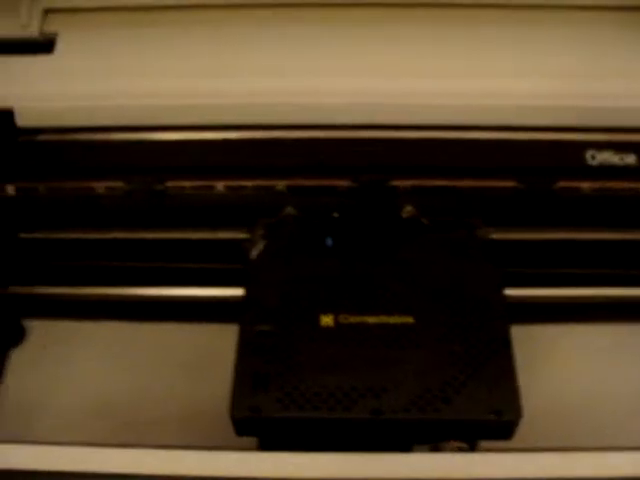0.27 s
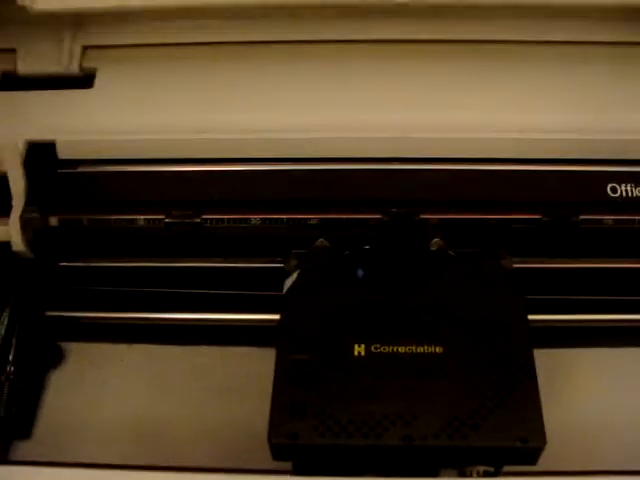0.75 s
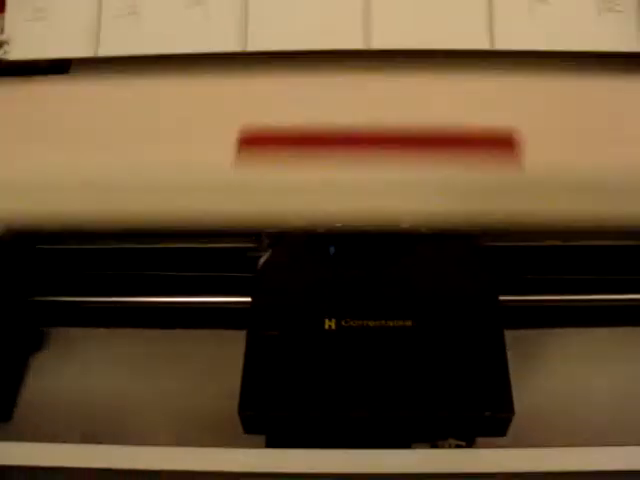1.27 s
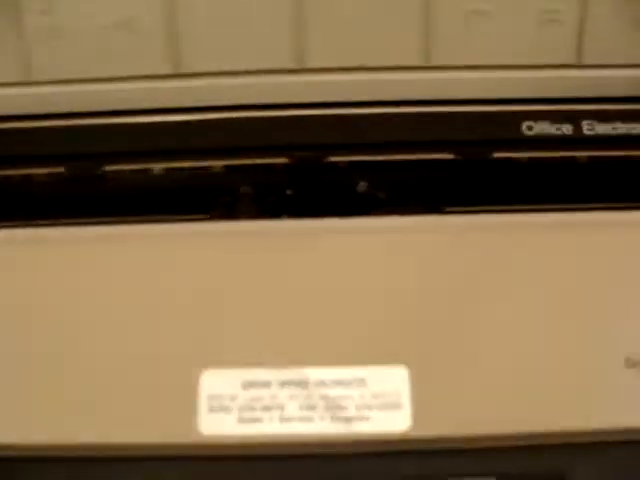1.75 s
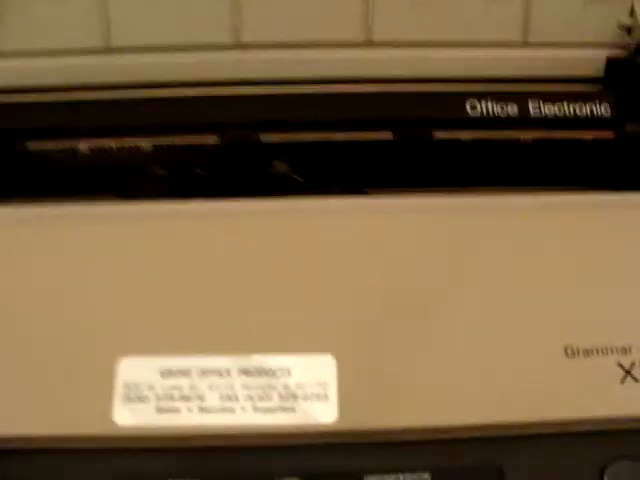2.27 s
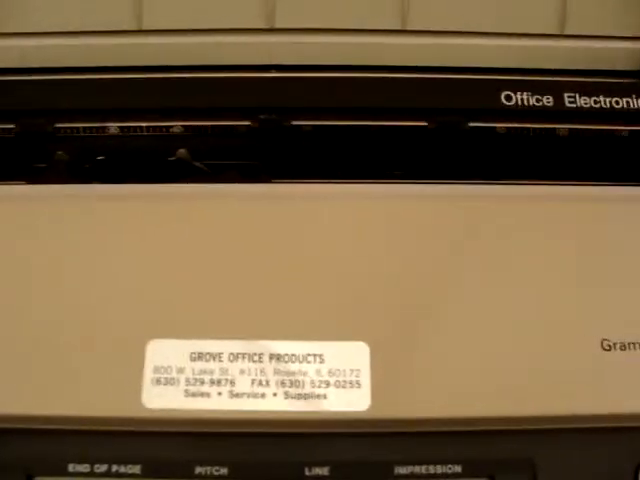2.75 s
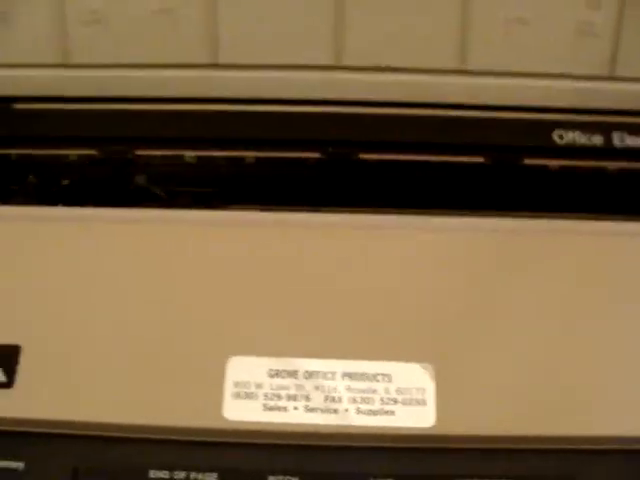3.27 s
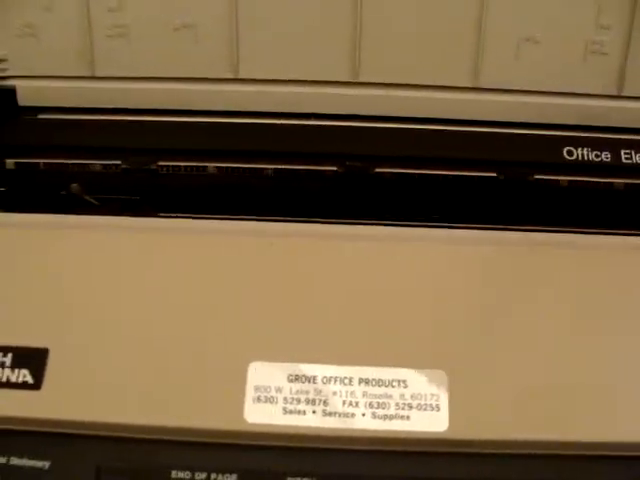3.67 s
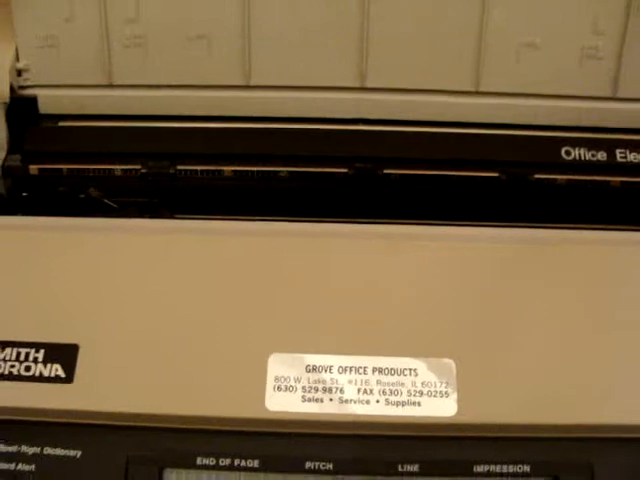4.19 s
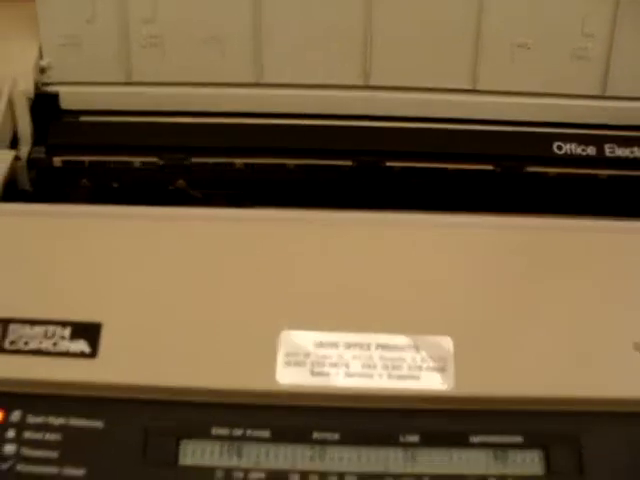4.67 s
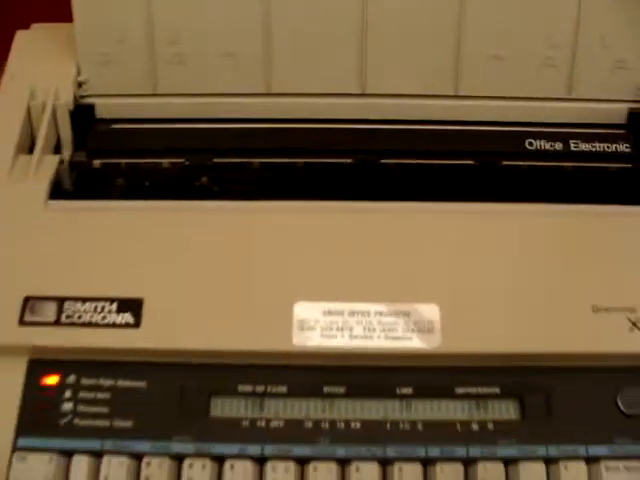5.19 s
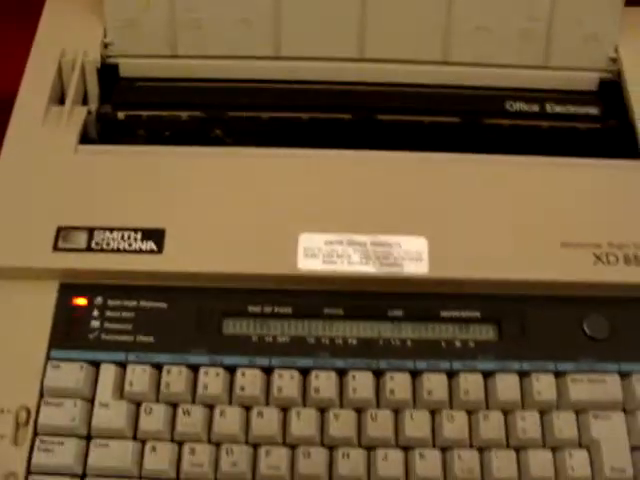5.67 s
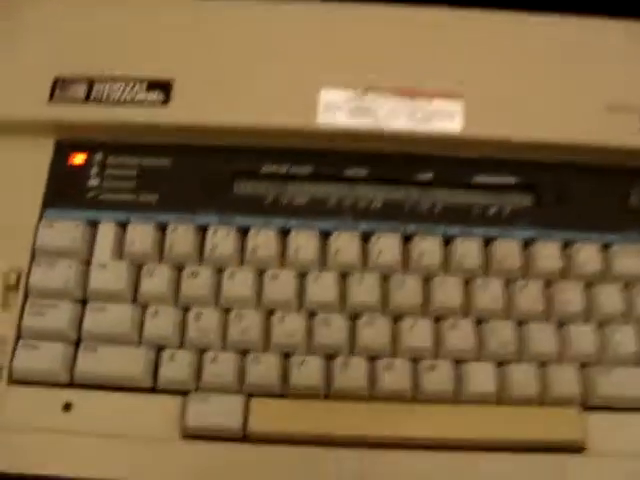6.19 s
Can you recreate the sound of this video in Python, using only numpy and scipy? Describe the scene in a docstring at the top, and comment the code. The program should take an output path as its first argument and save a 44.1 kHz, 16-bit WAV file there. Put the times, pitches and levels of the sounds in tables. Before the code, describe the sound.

Close to an electronic typewriter, small plastic knocks come first, then the hard bang of its lid, with a bright latch click and fast weakening chatter. The drive knocks rapidly through two whirring carrier runs. A steady low motor tone with gear buzz follows, ending in two clusters of clatter with crisp hammer snaps between them. The quiet room's hiss remains, with faint clothing movement and light touches near the end.

```python
"""A quiet room hisses softly, then a hand taps and slides on an electronic typewriter close by.
Motors spurt, the lid slams and chatters, and the print carrier whirrs along its rail in two runs.
A stepper motor hums for over a second, then carrier, print wheel and hammer clatter in short moves;
faint rustles of clothes end it. Blows and rattles are shaped noise and clicks driven through resonant
parts, motors are tones locked to their steps, and room and clothes are coloured noise."""
import sys
import numpy as np
from scipy import signal
from scipy.fft import rfft, irfft
from scipy.io import wavfile
from scipy.ndimage import uniform_filter1d, minimum_filter1d

SR = 44100
rng = np.random.default_rng(int(sys.argv[2]) if len(sys.argv) > 2 else 0)


def int16_out(signal):
    """Quantize to a 16-bit WAV file."""
    q = np.round(np.clip(np.atleast_2d(signal).T, -1, 1) * 32767)
    wavfile.write(sys.argv[1], SR, q.astype(np.int16))


N = 284004
TIME = np.arange(N) / SR
RING_TIME = np.arange(SR // 4) / SR
HALF_SECOND = np.arange(SR // 2) / SR


def from_db(db):
    """Decibels to amplitude."""
    return 10 ** (np.asarray(db) / 20)


def rms_one(x):
    """Scales a sound to an RMS of one."""
    return x / np.sqrt(np.mean(x ** 2) + 1e-20)


def in_time(rows, time=TIME):
    """Columns of a curve, joined by straight lines."""
    s, *columns = np.transpose(rows)
    return [np.interp(time, s, column) for column in columns]


def gate(start, end, fade, time=TIME):
    """One between start and end, with sloping edges."""
    return np.clip(np.minimum(time - start, end - time) / fade + .5, 0, 1)


def drift(rate, time=TIME):
    """Slow random wander with an RMS of one, through `rate` random points a second."""
    knots = rng.standard_normal(2048)
    return rms_one(np.interp(time * rate, np.arange(len(knots)), knots))


def dying(t60, time=RING_TIME):
    """Envelope of a ring that loses 60 dB in t60 seconds."""
    return np.exp(-np.log(1000) * time / t60)


def held(length, attack_s, release_t60):
    """Envelope that rises in a straight line, holds until `length`, then dies away."""
    attack = np.minimum(HALF_SECOND / attack_s, 1)
    return attack * dying(release_t60, np.maximum(HALF_SECOND - length, 0))


def add(out, s, sound):
    """Mixes a sound in at time s."""
    at = max(round(s * SR), 0)
    out[at:at + len(sound)] += sound[:N - at]


def colour(x, spectrum):
    """Causal (minimum-phase) filter with the given spectrum."""
    size = 4096
    hz, db = np.transpose(spectrum)
    grid = np.maximum(np.arange(size // 2 + 1) * SR / size, 1)
    gain = from_db(np.interp(np.log(grid), np.log(hz), db))
    # folding the cepstrum onto positive times makes the filter minimum-phase
    cepstrum = irfft(np.log(gain))
    folded = np.r_[cepstrum[0], 2 * cepstrum[1:size // 2]]
    impulse_response = irfft(np.exp(rfft(folded, size)))
    return signal.fftconvolve(x, impulse_response)[:len(x)]


def band(x, low, high):
    """Keeps the sound between two frequencies in Hz."""
    return signal.sosfilt(signal.butter(4, [low, high], "band", fs=SR, output="sos"), x)


def resonate(x, modes):
    """Parallel resonances added to the plain sound."""
    out = x
    for hz, width, db in modes:
        radius = np.exp(-np.pi * width / SR)
        feed = np.array([1, 0, -1]) * (1 - radius ** 2) / 2
        feedback = [1, -2 * radius * np.cos(2 * np.pi * hz / SR), radius ** 2]
        out = out + from_db(db) * signal.lfilter(feed, feedback, x)
    return out


# hiss spectrum: pitch_hz, level_db
ROOM_COLOUR = [(15, -49), (25, -4), (118, -4), (195, -7.5), (330, -5.5), (423, -6.5), (616, -2), (681, -7),
               (753, -4.5), (1070, -6.5), (1370, -10), (1480, -10), (1860, -9.5), (5720, -14.5),
               (9930, -21.5), (12900, -61), (21800, -120)]
# hollow resonances: pitch_hz, width_hz, level_db
ROOM_MODES = [(111, 17, 1.5), (253, 110, -2.5), (670, 100, -4), (1333, 69, 2.5), (1875, 33, 3)]
# rustle spectrum: pitch_hz, level_db
RUSTLE_COLOUR = [(100, -3), (300, -1), (700, 1), (1800, 2), (3500, -0.5), (6000, -5.5), (10000, -13.5)]
# swells of rustle, before their flutter: middle_s, half_length_s, level_db
RUSTLES = [(5.514, 0.19, -54), (6.03, 0.18, -49.5)]


def room(hiss_db=-51, flutter_db=3.5):
    """Soft hiss with a few hollow resonances, and a rustle of clothes that swells twice near the end."""
    air = resonate(colour(rng.standard_normal(N), ROOM_COLOUR), ROOM_MODES)
    cloth = rms_one(colour(rng.standard_normal(N), RUSTLE_COLOUR))
    swells = sum(from_db(db) * np.exp(-((TIME - s) / half) ** 2) for s, half, db in RUSTLES)
    return from_db(hiss_db) * rms_one(air) + swells * from_db(flutter_db * drift(40)) * cloth


# registers of every body; each part scales the decay times:
# low_hz, high_hz, blow_t60_s, rattle_t60_s, brightness_share
REGISTERS = [(60, 523, 0.23, 0.27, -0.55), (507, 1880, 0.14, 0.19, -0.32), (1990, 5260, 0.063, 0.094, 0.42),
             (4580, 10500, 0.044, 0.02, 0.62)]


def body(spectrum, modes):
    """Answer of a part to one click, split into the four registers."""
    answer = resonate(colour(signal.unit_impulse(4096), spectrum), modes)
    return [band(answer, low, high) for low, high, *_ in REGISTERS]


def strikes(blows, part, balance_db, ring_share, rise_s, room_db=-26, room_t60=0.075,
            attack_s=0.011, own_width_hz=70, own_db=3.0, count=4):
    """Each blow stirs the dense modes of the part in its own way; a faint room tail follows."""
    out = np.zeros(N)
    for s, level_db, bright_db in blows:
        # the spot that is struck favours a few metallic resonances of its own
        favoured = [(hz, own_width_hz, own_db) for hz in rng.uniform(2220, 3936, count)]
        for (_, _, t60, _, tilt), answer, share_db in zip(REGISTERS, part, balance_db):
            decay = dying(t60 * ring_share) + from_db(room_db) * dying(room_t60)
            decay = decay * (1 - np.exp(-RING_TIME / rise_s))
            stirred = resonate(rng.standard_normal(len(decay)) * decay, favoured)
            ring = signal.fftconvolve(stirred, answer)
            # the level counts the energy of a blow as if it all fell within the attack
            ring = ring / np.linalg.norm(ring) * np.sqrt(attack_s * SR)
            add(out, s, ring * from_db(level_db + share_db + tilt * bright_db))
    return out


def rattle(moves, part, balance_db, attack_s, release_share, contacts_per_s, spread_db, flutter_db,
           rub_db=-14):
    """Parts rub and shake in many small contacts: attack, hold, release with the treble dying first."""
    out, count = np.zeros(N), len(HALF_SECOND)
    for start, length, level_db, bright_db in moves:
        sizes = from_db(spread_db * np.minimum(rng.exponential(1, count), 3))
        clicks = sizes * rng.choice([-1, 1], count) * (rng.random(count) < contacts_per_s / SR)
        contacts = rms_one(clicks) + from_db(rub_db) * rng.standard_normal(count)
        shaken = contacts * from_db(flutter_db * drift(132, HALF_SECOND))
        for (*_, t60, tilt), answer, share_db in zip(REGISTERS, part, balance_db):
            sound = rms_one(signal.fftconvolve(shaken, answer)[:count])
            envelope = held(length, attack_s, t60 * release_share)
            add(out, start, sound * envelope * from_db(level_db + share_db + tilt * bright_db))
    return out


# In all blow and move tables level_db is set before the register balance (dB, low to high);
# brightness_db tilts treble against bass by the register shares.
# light taps of the hand: start_s, level_db, brightness_db
HANDLING_TAPS = [(0.679, -46, -20.5), (0.801, -30, -2.5), (0.821, -37.5, -7), (0.878, -27, 5.5),
                 (1.143, -47, -3), (1.432, -46, 4), (1.49, -40.5, -8), (4.924, -47, -3), (5.042, -48.5, -2),
                 (6.087, -45, -3), (6.229, -48.5, 8)]
# slides of the hand: start_s, length_s, level_db, brightness_db
HANDLING_SLIDES = [(0.745, 0.047, -41, 0.5), (0.88, 0.058, -44.5, -3), (1.03, 0.13, -55.5, -14.5),
                   (1.5, 0.097, -48, -4)]
# housing spectrum: pitch_hz, level_db
HANDLED_COLOUR = [(41, -36), (70, -11), (502, -7.5), (592, -6), (729, -2.5), (1220, -5), (1670, -8.5),
                  (1890, -10.5), (3380, -9.5), (9930, -42), (12900, -66), (21800, -120)]
# housing resonances: pitch_hz, width_hz, level_db
HANDLED_MODES = [(508, 21, 9), (700, 92, 6.5), (1004, 36, 6.5), (1605, 120, 6.5), (2320, 120, -8),
                 (3380, 160, -12), (8740, 450, 12)]


def handling():
    """Light taps and slides of a hand make the plastic housing ring and rub."""
    part = body(HANDLED_COLOUR, HANDLED_MODES)
    taps = strikes(HANDLING_TAPS, part, balance_db=(-6.5, -2.5, -3, -16.5), ring_share=0.9,
                   rise_s=0.0004, room_db=-29, room_t60=0.13, own_db=4)
    slides = rattle(HANDLING_SLIDES, part, balance_db=(-2.5, -4, -8, -47), attack_s=0.02,
                    release_share=1.64, contacts_per_s=1500, spread_db=2.0, flutter_db=-0.5)
    return taps + slides


# short motor spurts: start_s, length_s, steps_per_s, level_db (of the fundamental)
SPURTS = [(1.552, .11, 230, -33), (1.573, .17, 337, -30.5), (2.088, 0.18, 370, -39),
          (3.732, 0.02, 280, -24.5), (3.86, 0.02, 284, -30.5), (4.077, 0.1, 446, -41),
          (4.223, 0.036, 223, -35), (4.312, .06, 240, -31.5), (4.386, 0.034, 254, -28.5),
          (4.449, 0.083, 226, -31.5), (4.559, 0.02, 427, -26)]


def spurts(overtone_db=-17, unsteady=0.016, attack_s=0.0042, release_t60=.11):
    """Motors start and stop in a few dozen steps or less, slightly unsteady; the housing rings on."""
    out = np.zeros(N)
    for start, length, hz, db in SPURTS:
        phase = 2 * np.pi * hz * np.cumsum(1 + unsteady * drift(60, HALF_SECOND)) / SR
        overtones = np.sin(2 * phase) + .5 * np.sin(4 * phase)
        tone = np.sin(phase) + from_db(overtone_db) * overtones
        # a sine of RMS one peaks at the square root of two
        add(out, start, np.sqrt(2) * from_db(db) * tone * held(length, attack_s, release_t60))
    return out


# clacks of the mechanism: start_s, level_db, brightness_db
MECHANISM_CLACKS = [(1.599, -22, -1), (2.037, -30.5, 4.5), (2.24, -22.5, -15), (3.085, -34.5, -24),
                    (3.559, -37, 4.5), (3.621, -34, 12), (3.666, -31, 4), (3.678, -25.5, -2),
                    (3.688, -26.5, -3), (3.728, -26, 3), (3.744, -21.5, 4), (3.842, -19, -1),
                    (3.856, -30.5, 19), (3.877, -30.5, -10), (3.906, -27, 0.5), (4.231, -28, 5.5),
                    (4.265, -21, 6.5), (4.293, -21.5, -10), (4.359, -24, 7), (4.385, -23.5, 2),
                    (4.555, -22.5, -9)]
# clattering moves: start_s, length_s, level_db, brightness_db
MECHANISM_MOVES = [(1.557, 0.054, -27.5, -2), (3.675, .025, -25.5, 5), (3.726, 0.045, -26, 4),
                   (3.797, 0.023, -34, -8), (3.829, 0.042, -20.5, 2.5), (3.91, 0.19, -46, -4),
                   (4.228, 0.076, -26.5, -1), (4.345, 0.053, -26, 2), (4.41, 0.17, -39.5, -4),
                   (4.531, 0.066, -28.5, 1.5)]
# snaps of the hammer: start_s, level_db, brightness_db
HAMMER_BLOWS = [(3.757, -10.5, -3.5), (3.788, -18.5, -3.5), (4.119, -28, -10), (4.1255, -12, 2.5)]
# spectra of mechanism and hammer: pitch_hz, level_db
MECHANISM_COLOUR = [(41, -67), (70, -20), (258, -1), (345, -5.5), (434, -9.5), (729, -12.5), (1330, -16),
                    (1470, -20.5), (1670, -21.5), (3310, -5.5), (4420, -17.5), (8950, -24), (9930, -28.5),
                    (12900, -73), (21800, -120)]
HAMMER_COLOUR = [(41, -55), (70, -30), (443, -16), (545, -12.5), (1640, -14.5), (2800, 0.5), (3990, -10),
                 (4420, -12.5), (6700, -22.5), (8950, -14.5), (9930, -20.5), (12900, -47), (21800, -120)]
# resonances of mechanism and hammer: pitch_hz, width_hz, level_db
MECHANISM_MODES = [(261, 59, 0.5), (437, 38, 1), (886, 62, -2), (1696, 35, 11.5), (2020, 20, -32),
                   (2430, 150, 3.5), (3160, 1700, -15), (4400, 47, -29), (5000, 71, -16), (6280, 38, -30),
                   (7900, 370, -6), (9070, 62, -18)]
HAMMER_MODES = [(440, 17, -2), (2940, 120, 3.5), (2840, 90, -6), (3470, 150, 2), (4520, 60, 6),
                (5620, 130, 10), (6550, 77, 4), (8200, 360, -11)]


def mechanism():
    """Carrier, print wheel and ribbon drive clack and clatter in short moves; the hammer snaps between."""
    part = body(MECHANISM_COLOUR, MECHANISM_MODES)
    clacks = strikes(MECHANISM_CLACKS, part, balance_db=(-7.5, -6.5, -2, -12), ring_share=1.0,
                     rise_s=0.00022)
    moves = rattle(MECHANISM_MOVES, part, balance_db=(-2.5, -4.5, -3.5, -16), attack_s=0.0097,
                   release_share=0.88, contacts_per_s=900, spread_db=2.0, flutter_db=2.0)
    hammer = strikes(HAMMER_BLOWS, body(HAMMER_COLOUR, HAMMER_MODES), balance_db=(-15, -11, 0, -9),
                     ring_share=1.0, rise_s=0.00028, own_db=-10)
    return clacks + moves + hammer


# landing and latch of the lid: start_s, level_db, brightness_db
LID_BLOWS = [(1.644, -3.5, -4.5), (1.671, -10.5, 11.5)]
# shaking of the machine: start_s, length_s, level_db, brightness_db
LID_SHAKE = [(1.646, 0.064, -20.5, 0.0081)]
# lid spectrum: pitch_hz, level_db
LID_COLOUR = [(41, -54), (70, -24), (178, -17), (318, -5.5), (360, -7), (685, -9), (744, -5), (915, -6),
              (1970, -6), (3750, -6.5), (9930, -3), (12900, -35), (21800, -120)]
# lid resonances: pitch_hz, width_hz, level_db
LID_MODES = [(303, 36, -8), (610, 26, 8), (880, 64, 2), (1550, 70, -1.5), (1750, 160, -14),
             (2350, 110, -10), (3250, 140, -5), (3960, 83, -8), (5400, 350, -5), (8400, 340, 3)]


def lid(count=6, rebound_s=.0153, rebound_db=-20, loss_db=0.8, rebound_bright_db=0.5):
    """The lid lands, latches, chatters in ever weaker rebounds and shakes the whole machine."""
    part = body(LID_COLOUR, LID_MODES)
    landing = LID_BLOWS[0][0]
    rebounds = [(landing + (k + 1) * rebound_s, rebound_db - k * loss_db, rebound_bright_db)
                for k in range(count)]
    blows = strikes(LID_BLOWS + rebounds, part, balance_db=(-11.5, -7.5, 0.5, -12.5),
                    ring_share=1.85, rise_s=0.00049)
    shake = rattle(LID_SHAKE, part, balance_db=(-3.5, -9, 4.5, -2), attack_s=.003,
                   release_share=1.17, contacts_per_s=1500, spread_db=3, flutter_db=5.0)
    return blows + shake


# runs of the carrier: start_s, length_s, level_db, brightness_db
RAIL_RUNS = [(1.77, 0.24, -35.5, 0.49), (2.036, 0.2, -34.5, 1)]
# rail spectrum: pitch_hz, level_db
RAIL_COLOUR = [(41, -53), (70, -21.5), (197, -18.5), (264, -3), (375, -5.5), (592, -12), (994, -6.5),
               (1170, -10.5), (2050, -13), (2280, -4.5), (3050, -1), (4330, -14), (9930, -21), (12900, -53),
               (21800, -120)]
# rail resonances: pitch_hz, width_hz, level_db
RAIL_MODES = [(272, 58, -3), (382.6, 21, 8), (543, 18, -1), (914, 38, -2), (995, 19, 9.5), (1740, 250, -2),
              (2365, 67, 1), (2730, 120, 0), (3180, 130, -9), (3820, 260, 2), (5250, 320, 5)]


def carrier(turn_s=.0219, knock_db=7, spread_db=1, jitter_s=.001):
    """The carrier whirrs along the rail in two runs, and its drive knocks once a turn."""
    part = body(RAIL_COLOUR, RAIL_MODES)
    knocks = []
    for start, length, level_db, bright_db in RAIL_RUNS:
        for s in np.arange(start, start + length - turn_s / 2, turn_s):
            late, harder = rng.standard_normal(2)
            knocks.append((s + jitter_s * late, level_db + knock_db + spread_db * harder, bright_db))
    whirr = rattle(RAIL_RUNS, part, balance_db=(-3.5, -2.5, 1, -9.5), attack_s=0.0034,
                   release_share=2.15, contacts_per_s=900, spread_db=1.5, flutter_db=2.0)
    return whirr + strikes(knocks, part, balance_db=(-11, -6.5, -1.5, -12.5), ring_share=1.0,
                           rise_s=0.00049)


# long stepper run: start_s, fundamental_db, octave_db, gear_db (before the buzz trim)
STEPPER = [(2.3, -28.5, -43.5, -45.5), (2.52, -32.5, -37.5, -44.5), (2.674, -46, -37, -44),
           (2.75, -33.5, -35.5, -43), (2.93, -28.5, -39, -43), (3.01, -25, -40, -39.5),
           (3.148, -25.5, -52.5, -44.5), (3.41, -26.5, -45, -49), (3.66, -28.5, -41, -46)]
# motor speed: start_s, steps_per_s
STEP_RATE = [(2.22, 300), (2.27, 262), (2.32, 246.2), (3.7, 246.2)]
STEP_HZ, STEPS_A_CYCLE = 246.2, 6   # settled step rate; steps before the tick pattern repeats
# weaker tones, before load and waver, set to the nearest sixth of the step rate: pitch_hz, level_db
STEPPER_TONES = [(123, -60.5), (164, -52), (287, -49.5), (328, -54.5), (369, -52), (410, -52), (615, -49),
                 (739, -56), (862, -56.5), (985, -51), (1108, -57), (1231, -62.5), (1354, -57.5),
                 (1477, -58), (1600, -65.5), (1682, -61.5), (1723, -54), (1929, -63.5), (2462, -66),
                 (2585, -56.5), (3037, -64), (3201, -65.5), (3693, -63)]
# gear buzz spectrum: pitch_hz, level_db
BUZZ_COLOUR = [(250, -14), (600, -6.5), (950, 2), (1200, -2.5), (1450, -3.5), (1690, -2.5), (2050, -9.5),
               (2500, 2), (2880, -4), (3080, -0.5), (3450, -6), (3700, -6), (4500, -17.5), (9000, -29)]


def stepper(buzz_db=-1, shake_db=-47, waver_db=2.5, usual_buzz_db=-44, jitter_steps=0.028,
            follow=0.36, loose=.7):
    """A near-sine at the step rate; unequal steps add undertones, and each step ticks in the gears."""
    rate, = in_time(STEP_RATE)
    first_db, octave_db, gear_db = in_time(STEPPER)
    steps = np.cumsum(rate) / SR + jitter_steps * drift(20)
    hum = from_db(first_db) * np.sin(2 * np.pi * steps)
    hum += from_db(octave_db) * np.sin(4 * np.pi * steps)
    # the weaker tones swell with the load on the gears
    load_db = follow * (gear_db - usual_buzz_db)
    for hz, db in STEPPER_TONES:
        multiple = np.round(hz / STEP_HZ * STEPS_A_CYCLE) / STEPS_A_CYCLE
        level = from_db(db + load_db + waver_db * drift(6.2))
        hum += level * np.sin(2 * np.pi * (multiple * steps + rng.random()))
    # each step of the cycle has its own tick, slowly changing in strength: many fine buzzing lines
    ticks = np.zeros(N)
    for step in range(STEPS_A_CYCLE):
        pulses = np.diff(np.floor((steps + step) / STEPS_A_CYCLE), prepend=0)
        pulses = pulses * from_db(2.5 * drift(5.34))
        tick = rng.standard_normal(len(RING_TIME)) * dying(0.062)
        ticks += signal.fftconvolve(pulses, tick)[:N]
    # play in the gears makes each tick a little noisy
    play = rng.standard_normal(N) * np.exp(-(steps % 1))
    buzz = colour(rms_one(ticks) + loose * rms_one(play), BUZZ_COLOUR)
    # the buzz level is set by its treble
    buzz = buzz / np.std(band(buzz, 2510, 4500)) * from_db(gear_db + buzz_db)
    shake = from_db(shake_db) * rms_one(band(rng.standard_normal(N), 194, 740))
    return (np.sqrt(2) * hum + buzz + shake) * gate(2.245, 3.68, fade=0.035)


def scene():
    """Machine and room, heard from one point."""
    machine = handling() + spurts() + mechanism() + lid() + carrier() + stepper()
    return (room() + machine)[None]


def record(dry, ceiling=0.67, cutoff_hz=10050):
    """A fast limiter holds the loudest blows down; the top is cut."""
    top_cut = signal.ellip(10, .3, 70, cutoff_hz, fs=SR, output="sos")
    needed = ceiling / np.maximum(np.abs(signal.sosfilt(top_cut, dry)), ceiling)
    gain = uniform_filter1d(minimum_filter1d(needed, size=64), size=64)
    return signal.sosfilt(top_cut, dry * gain)


dry = scene()
out = record(dry)
int16_out(out)
```